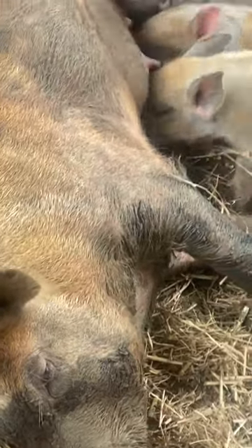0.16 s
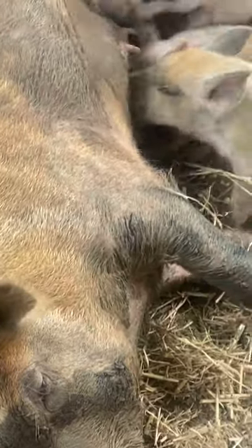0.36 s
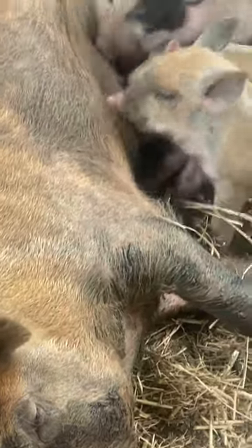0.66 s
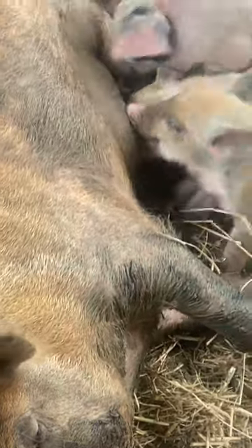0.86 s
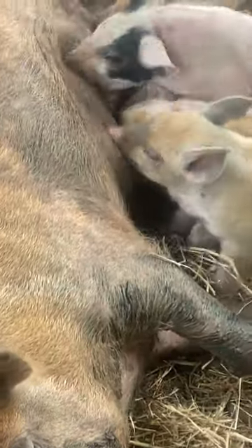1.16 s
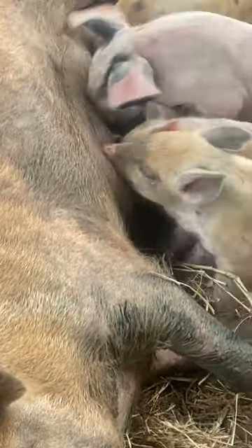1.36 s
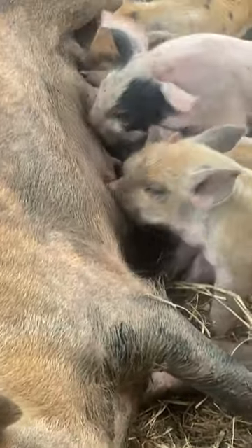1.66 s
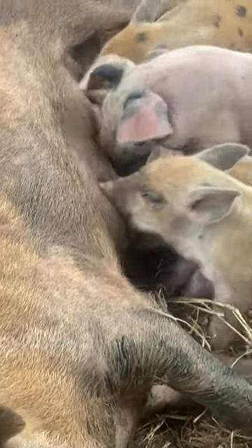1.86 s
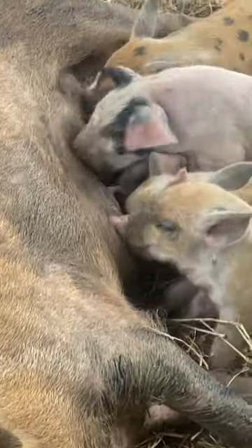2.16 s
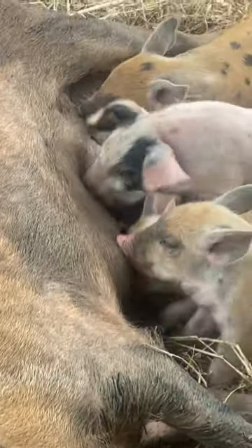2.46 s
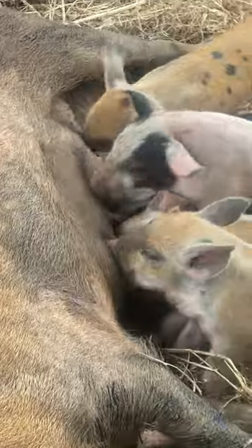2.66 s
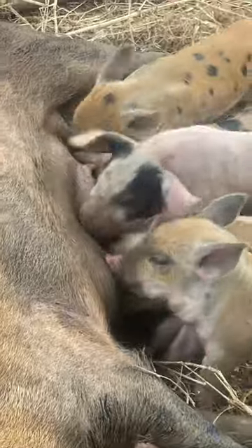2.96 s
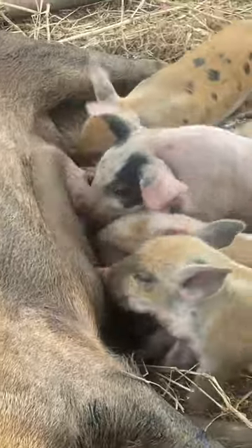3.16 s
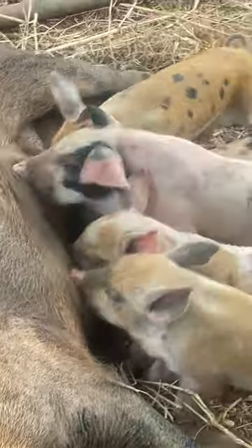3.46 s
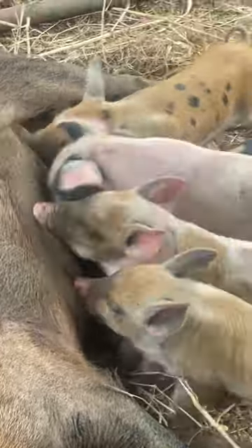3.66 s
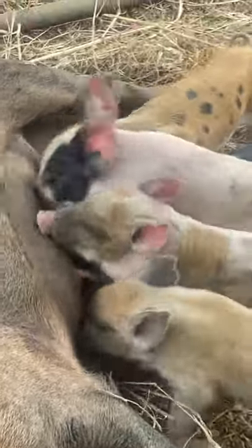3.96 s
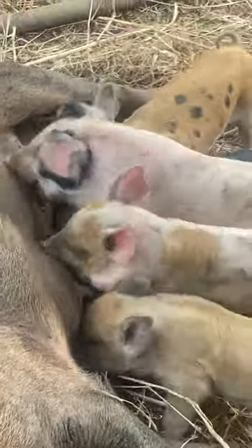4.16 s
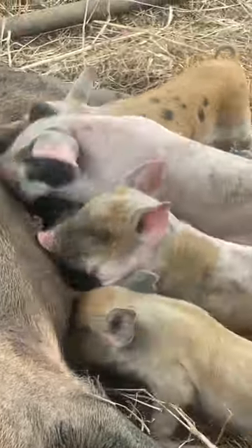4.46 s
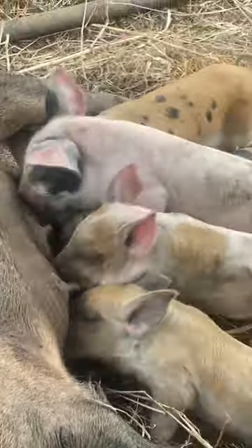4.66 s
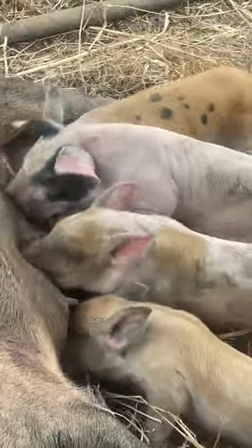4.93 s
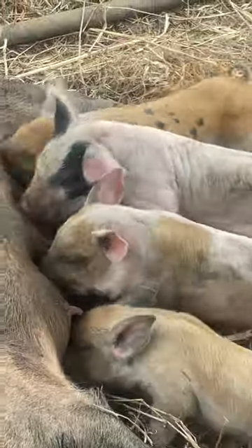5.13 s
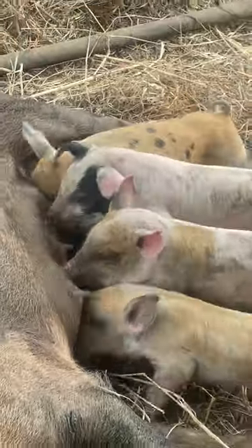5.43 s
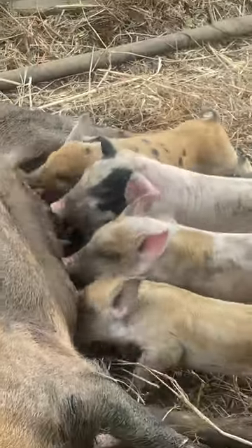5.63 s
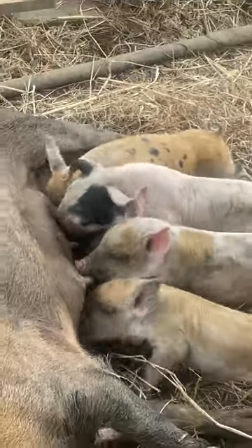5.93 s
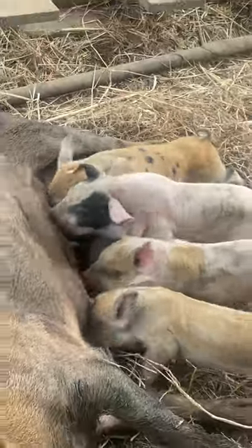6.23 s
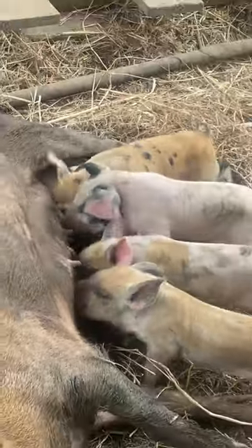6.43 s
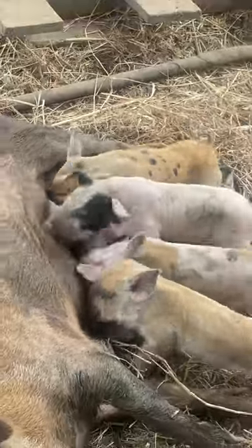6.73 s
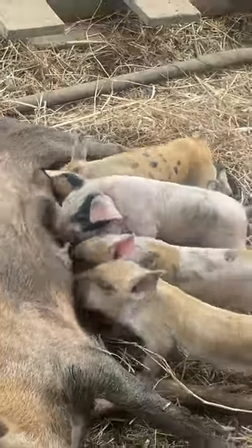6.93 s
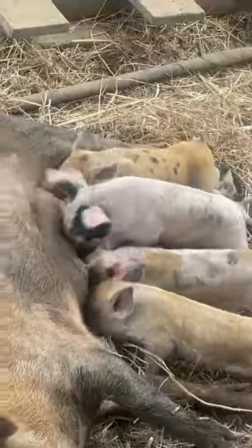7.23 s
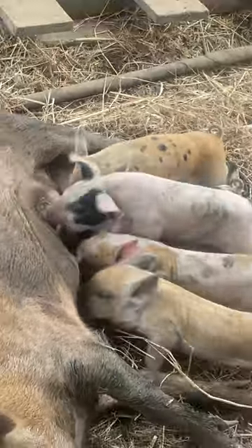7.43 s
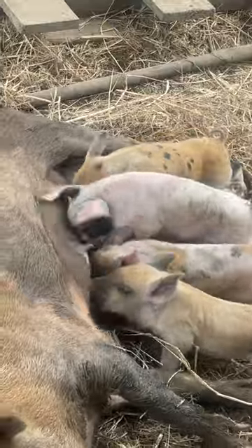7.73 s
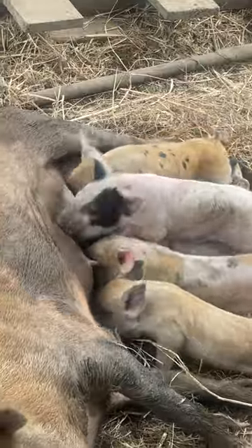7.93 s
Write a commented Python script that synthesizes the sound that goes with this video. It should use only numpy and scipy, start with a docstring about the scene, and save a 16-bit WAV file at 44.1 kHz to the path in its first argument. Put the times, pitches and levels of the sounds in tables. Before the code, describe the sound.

Short, deep, throaty grunts from a sow keep up a slow, steady pulse near the microphone. Much softer, her suckling piglets smack, snuffle and let out a few tiny grunts and faint, thin squeaks, while straw rustles lightly now and then. The pen has a slight echo, with a soft outdoor rumble and a high, insect-like hiss in the background.

```python
"""Low, rattling grunts come in a slow rhythm: a sow lies in straw, nursing her piglets.
Each grunt is a handful of slow vocal-fold beats that excite the resonances of her throat and snout,
sharp in the middle and soft at the end. The piglets grunt, smack, snuffle and squeak at the teats,
and straw ticks under their feet. The pen returns a short echo; behind it all lie low farm air
and a steady high hiss, like far insects."""
import sys
import numpy as np
from scipy import signal
from scipy.fft import rfft, irfft, next_fast_len
from scipy.io import wavfile
from scipy.ndimage import uniform_filter1d

SR = 44100
rng = np.random.default_rng(int(sys.argv[2]) if len(sys.argv) > 2 else 0)


def master(y):
    """Save y as 16-bit WAV."""
    cut = np.clip(np.atleast_2d(y).T, -1, 1)
    pcm = np.round(cut * 32767)  # scale
    wavfile.write(sys.argv[1], SR, pcm.astype(np.int16))


N = 356769
RING_SIZE = 8192  # samples in which a resonance dies away

# the sow's grunts: start_s, beat_count, first_rate_hz, snap_attack_s, snap_hold_s, chest_db, snap_db
SOW_GRUNTS = [(0.061, 7, 35.94, 0.036, 0.061, -25, -26.5), (0.5765, 6, 35.55, 0.033, 0.023, -26.5, -27.5),
              (0.983, 6, 35.9, 0.034, 0.021, -24, -29.5), (1.159, 6, 33, .058, .01, -28, -31),
              (1.374, 7, 33.75, 0.019, 0.095, -25.5, -25.5), (1.739, 6, 34.36, 0.059, 0.02, -26.5, -27),
              (2.217, 7, 35.73, 0.073, 0.011, -25, -27), (2.7221, 7, 36.72, .038, 0.034, -25.5, -25),
              (3.226, 6, 34.94, 0.022, 0.054, -24, -28.5), (3.631, 6, 36.45, 0.07, 0.011, -25.5, -30),
              (4.135, 5, 34.55, 0.036, 0.035, -26, -31), (4.245, 9, 32.9, .05, .1, -28.5, -58),
              (4.5223, 6, 32.55, 0.031, .012, -25.5, -32.5), (4.7426, 7, 32.55, 0.043, 0.07, -27, -27),
              (5.0931, 6, 35.98, 0.047, 0.033, -24.5, -24), (5.4521, 6, 35.43, 0.056, 0.053, -25, -25.5),
              (5.8957, 5, 36.15, 0.014, 0.048, -23, -25.5), (6.3064, 7, 35.24, .053, 0.043, -25.5, -24.5),
              (6.601, 6, 36.52, 0.05, 0.03, -24.5, -29.5), (6.9653, 7, 36.28, 0.043, 0.031, -24, -25.5),
              (7.43, 7, 38.5, 0.038, 0.045, -23.5, -23), (7.822, 7, 36.44, 0.054, 0.018, -23.5, -22)]
# resonances of her throat, snout and pen: centre_hz, width_hz, gain_db
SOW_RESONANCES = [(73.4, 34.7, -4), (130, 8, -7), (153.3, 57, -0.5), (231, 26, -12.5), (298, 48, -10.5),
                  (434, 35, -3.5), (484, 41, -8), (567, 79, -8), (640, 67, -11.5), (717, 61, -13.5),
                  (795, 63, -18), (852, 49, -8.5), (913.3, 42, -9.5), (955, 160, -20), (1098, 107, -24.5),
                  (1280, 83, -26), (1360, 150, -26), (1493, 34, -16), (1544, 206, -23), (1729, 20, -21.5),
                  (2347, 300, -25), (2833, 83, -24.5), (2974, 107, -26), (3098, 46, -22), (3715, 40, -22.5),
                  (4010, 620, -24.5), (4255, 110, -18), (5140, 180, -34), (8500, 210, -37.5),
                  (9940, 73, -32.5)]
# the piglets' grunts: middle_s, half_length_s, top_pitch_hz, level_db
PIGLET_GRUNTS = [(4.334, 0.12, 151.8, -35.5), (5.071, 0.0356, 150, -46), (6.216, 0.061, 148.4, -49)]
# resonances of a piglet's throat: centre_hz, width_hz, gain_db
PIGLET_RESONANCES = [(156, 107, 6.5), (325, 74, 1), (678, 120, -3.5), (1380, 130, -18), (1740, 640, -22),
                     (3750, 1300, -28.5)]
# wet smacks on the teats: start_s, peak_db, mouth_resonance_hz, t60_s
SMACKS = [(0.7954, -68, 4540, 0.05), (1.14, -42, 4170, 0.043), (2.1356, -49.5, 3220, 0.044),
          (2.148, -47, 2850, 0.035), (2.9057, -33, 3100, 0.023), (5.848, -44.5, 2180, 0.053),
          (6.041, -34, 3520, 0.076), (6.581, -45.5, 2690, 0.05), (6.835, -38.5, 2320, 0.081),
          (7.639, -42, 3950, 0.055)]
# the pigs' snuffles: middle_s, half_length_s, snout_hum_db, nostril_hiss_db
SNUFFLES = [(0.297, 0.31, -87, -63), (0.895, 0.062, -58, -68.5), (3.09, 0.096, -56, -63.5),
            (3.43, 0.081, -53, -53.5), (3.578, 0.094, -64.5, -60.5), (4.084, 0.022, -60, -58),
            (4.338, 0.055, -45.5, -56.5), (5.092, 0.014, -40.5, -52), (6.215, .07, -51, -57),
            (6.907, 0.047, -62, -61.5), (7.312, 0.11, -56.5, -60.5), (7.435, 0.023, -35, -70)]
# thin squeaks: middle_s, half_length_s, pitch_hz, glide_hz_per_s, level_db
SQUEAKS = [(1.625, 0.025, 3300, 4000, -62), (1.905, 0.017, 3580, -15000, -53),
           (5.563, .3, 2250, -250, -67.5)]
# rustles of straw: middle_s, half_length_s, level_db
RUSTLES = [(1.146, .12, -54), (1.344, .025, -53), (3.648, .25, -60), (5.081, 0.025, -49.5),
           (5.856, .011, -51.5), (6.583, 0.0062, -48)]
# swells of the insects' shrill band: middle_s, half_length_s, level_db
INSECT_SWELLS = [(2.05, 1, -60.5), (5.115, 0.74, -65)]
# spectrum of the farm air: frequency_hz, relative_db
AIR_SPECTRUM = [(18, -40), (30, 7.5), (155, 17), (767, -0.5), (909, 0), (1170, -0.5), (1690, -5),
                (2180, 0.5), (2420, -2.5), (2940, 0), (3790, -3.5), (4900, 3.5), (6370, -39), (10800, -120)]
# spectrum of the high hiss: frequency_hz, relative_db
HISS_SPECTRUM = [(4000, -27.5), (4600, 2.5), (4890, -43), (5100, 0), (5900, -1), (6700, 2.5), (7300, -6),
                 (8500, -7), (10300, -7), (11500, -17.5), (13000, -105)]
# slow drift of the hiss: time_s, level_db
HISS_LEVEL = [(0.0, -54.5), (0.99, -57), (1.28, -57), (2.72, -57.5), (4.71, -55), (7.21, -56),
              (8.09, -54.5)]
# balance of the two microphone ports: frequency_hz, left_minus_right_db
PORT_BALANCE = [(250, 0), (420, 1), (700, 3), (1120, 2), (1800, 0), (11000, 0)]
# phase between the ports: frequency_hz, left_lead_rad
PORT_PHASE = [(200, 0), (430, -.45), (700, -.3), (950, .3), (1800, .1), (2580, 1.1), (3400, .4), (4100, .5),
              (4650, 1.4), (5250, 0), (6500, .9), (7500, 1.4), (11000, 2.3)]


def sow_grunts(quicken_per_beat=.025, jitter=.005, first_beat_s=.00205, beat_s=.011, lag_cycles=1.532,
               scatter_db=1.74, snap_scatter_db=2.2, stretch=.018, sag=.052,
               rasp_db=-5, rasp_s=.027, rasp_hz=1100):
    """Source and filter: fold beats ring the throat; the harder the folds shut, the brighter the beat."""
    hz, age, out = freqs(RING_SIZE), np.arange(RING_SIZE) / SR, np.zeros(N)
    throat = resonances(hz, SOW_RESONANCES) / np.sqrt(1 + (38 / hz) ** 6)
    throat *= np.sqrt(beat_s * SR / np.sum(irfft(throat) ** 2))  # the energy of beat_s at rms 1
    snap_share = on_log(hz, [(170, 0), (600, .6), (1200, 1), (4000, 1.2)])
    # as the grunt runs out the folds slacken: more boom and hollow, less edge
    slack_db = on_log(hz, [(80, 12), (150, 0), (400, 6), (850, 6), (1500, 0), (4000, -10)])
    # the lows leave the body a little later than the snap
    bass_lag = np.exp(-2j * np.pi * lag_cycles * np.log(1 + hz / 120))
    rasp_gain = undb(rasp_db) / np.sqrt((1 + (hz / rasp_hz) ** 2) * (1 + (220 / hz) ** 4))
    for start, beats, first_hz, attack, hold, chest_db, snap_db in SOW_GRUNTS:
        rates = first_hz * (1 + quicken_per_beat * np.arange(beats - 1))
        periods = (1 + jitter * rng.standard_normal(len(rates))) / rates
        times = np.r_[first_beat_s, np.cumsum(periods)]
        for t in times:
            progress = t / times[-1]
            size, edge, shape = rng.standard_normal(3)
            chest = chest_db + arch(progress, peak=.46, half=.51)
            snap = snap_db + snap_envelope(t, attack, hold) + snap_scatter_db * edge
            brightness_db = max(snap - chest, -22) * snap_share
            beat_db = chest + brightness_db + slack_db * (progress - .5) + scatter_db * size
            # the soft throat changes shape from beat to beat; its low resonances sink at the very end
            sink = sag * progress ** 4 / (1 + (hz / 500) ** 2)
            ring = np.interp(hz * (1 + stretch * shape + sink), hz, throat)
            # loose tissue keeps fluttering in the air stream after each closure
            flutter = rng.standard_normal(RING_SIZE) * np.exp(-(age / rasp_s) ** 2)
            push = 1 + rasp_gain * rfft(flutter / np.linalg.norm(flutter))
            add(out, start + t, irfft(push * causal(ring * undb(beat_db)) * bass_lag))
    return out


def snap_envelope(t, attack, hold, onset_db=-23, release_db_per_s=358):
    """Attack, hold and release: how hard the folds shut, in dB."""
    return onset_db * max(1 - t / attack, 0) ** 1.58 - release_db_per_s * max(t - attack - hold, 0)


def piglet_grunts(droop=.12, roughness=.07, breath_db=-5):
    """Source and filter: uneven fold beats and breath drive a small throat; pitch arches with effort."""
    t, out = np.arange(N) / SR, np.zeros(N)
    waver = 1 + roughness * walk(200)
    breath = undb(breath_db) * rng.standard_normal(N)
    throat = resonances(freqs(N), PIGLET_RESONANCES)
    for middle, half, top_hz, db in PIGLET_GRUNTS:
        pitch = top_hz * (1 - droop * np.minimum(((t - middle) / half) ** 2, 1))
        cycles = np.cumsum(pitch * waver) / SR
        pulses = unit(np.diff(np.floor(cycles), prepend=0))
        out += unit(shaped(pulses + breath, throat)) * undb(db + arch(t, middle, half))
    return out


def smacks(width_hz=1500, grain=.14, attack_s=.0025):
    """Cavity resonance: a lip lets go of a teat, and a burst of tiny wet clicks rings the mouth."""
    t, out = np.arange(RING_SIZE) / SR, np.zeros(N)
    for start, db, hz, t60 in SMACKS:
        clicks = rng.standard_normal(RING_SIZE) * np.exp(grain * held_noise(RING_SIZE, 64))
        envelope = undb(-60 * t / t60) * (1 - np.exp(-t / attack_s))
        mouth = causal(resonances(freqs(RING_SIZE), [(hz, width_hz, 0)]))
        burst = shaped(clicks * envelope, mouth)
        add(out, start, burst / np.abs(burst).max() * undb(db))
    return out


def snuffles(puff_delay_s=.006, puff_half_s=.013, puff_re_chest_db=-24.5):
    """Turbulence: air hums in a snout and hisses at the nostrils; a puff opens each of the sow's grunts."""
    puffs = [(start + puff_delay_s, puff_half_s, chest_db + puff_re_chest_db)
             for start, *_, chest_db, _ in SOW_GRUNTS]
    hums = [(middle, half, db) for middle, half, db, _ in SNUFFLES]
    hisses = [(middle, half, db) for middle, half, _, db in SNUFFLES]
    snout = noise_swells(puffs + hums, centre_hz=500, spread=1, grain_db=4)
    nostrils = noise_swells(hisses, centre_hz=2450, spread=.78, grain_db=3)
    return snout + nostrils


def squeaks(waver=.016):
    """Frequency modulation: thin whistles glide and waver in pitch as they swell and fade."""
    t, out = np.arange(N) / SR, np.zeros(N)
    for middle, half, hz, glide, db in SQUEAKS:
        pitch = (hz + glide * np.clip(t - middle, -2 * half, 2 * half)) * (1 + waver * walk(200))
        whistle = unit(np.sin(2 * np.pi * np.cumsum(pitch) / SR))
        out += whistle * undb(db + arch(t, middle, half))
    return out


def straw_rustles():
    """Friction noise: a piglet shifts its feet in the straw."""
    return noise_swells(RUSTLES, centre_hz=7900, spread=1, grain_db=3)


def straw_ticks(ticks_per_s=45, level_db=-69, centre_hz=6000, width_hz=9000, stir_db=4):
    """Shot noise: stalks tick at random under the piglets' feet, in fits and starts."""
    onsets = rng.random(N) < ticks_per_s / SR
    strength_db = 3.5 * np.minimum(rng.exponential(size=N), 3) + stir_db * walk(3.96)
    crack = rng.standard_normal(600) * np.exp(-np.arange(600) / 130)
    ticks = signal.fftconvolve(onsets * undb(strength_db), crack)[:N]
    return band(ticks, centre_hz, width_hz) * undb(level_db)


def pen_echo(x, delay_s=.01):
    """Reverberation: boards and roof scatter sound briefly, a faint tail follows, and the bass escapes."""
    t, echo = np.arange(2 * RING_SIZE) / SR, 0
    for db, t60_s, low_cut_hz in (-11, .094, 600), (-27, .88, 200):
        tail = rng.standard_normal(len(t)) * undb(-60 * t / t60_s) * (t > delay_s)
        low_cut = causal(1 / np.sqrt(1 + (low_cut_hz / freqs(len(t))) ** 4))
        echo = echo + undb(db) * shaped(tail / np.linalg.norm(tail), low_cut)
    return signal.fftconvolve(x, echo)[:N]


def insects(centre_hz=6580, width_hz=380, floor_db=-70, throb_db=2):
    """Amplitude modulation: a distant, shrill band of noise throbs, swells and sinks."""
    t = np.arange(N) / SR
    shrill = band(rng.standard_normal(N), centre_hz, width_hz)
    swell_power = sum(undb(db + arch(t, middle, half)) ** 2 for middle, half, db in INSECT_SWELLS)
    return shrill * np.sqrt(undb(floor_db) ** 2 + swell_power) * undb(-throb_db * walk(25))


def air_and_hiss(air_db=-58.5, wander_db=5.5, flicker_db=.64):
    """Coloured noise: low farm air wanders in level beneath a steady high hiss."""
    air, hiss = (unit(shaped(rng.standard_normal(N), undb(on_log(freqs(N), spectrum))))
                 for spectrum in (AIR_SPECTRUM, HISS_SPECTRUM))
    hiss_db = np.interp(np.arange(N) / SR, *np.transpose(HISS_LEVEL))
    return air * undb(air_db + wander_db * walk(8.7)) + hiss * undb(hiss_db + flicker_db * walk(30))


def noise_swells(rows, centre_hz, spread, grain_db):
    """Grainy noise in one resonance, swelling once for each row of middle_s, half_length_s, level_db."""
    out, size = np.zeros(N), 4 * RING_SIZE
    t = (np.arange(size) - size / 2) / SR
    for middle, half, db in rows:
        grains = rng.standard_normal(size) * undb(grain_db * held_noise(size, 128))
        swell = band(grains, centre_hz, spread * centre_hz) * undb(db + arch(t, 0, half))
        add(out, max(middle + t[0], 0), swell[middle + t >= 0])
    return out


def resonances(hz, modes):
    """Gain of steep-sided resonances whose powers add."""
    return np.sqrt(sum((undb(db) / (1 + ((hz ** 2 - centre ** 2) / (hz * width)) ** 2)) ** 2
                       for centre, width, db in modes))


def causal(gain):
    """Minimum phase: the spectrum of the quickest causal ring that has this gain."""
    cepstrum = irfft(np.log(gain + 1e-9))
    half = len(cepstrum) // 2
    cepstrum[1:half] *= 2
    cepstrum[half + 1:] = 0
    return np.exp(rfft(cepstrum))


def shaped(x, gain):
    """Linear filtering: one gain for each frequency bin."""
    size = next_fast_len(len(x), real=True)
    return irfft(rfft(x, size) * np.interp(freqs(size), freqs(len(x)), gain), size)[:len(x)]


def band(x, centre_hz, width_hz):
    """Band-pass filtering by one resonance, scaled to rms 1."""
    return unit(shaped(x, resonances(freqs(len(x)), [(centre_hz, width_hz, 0)])))


def walk(rate_hz):
    """Smoothed noise: a random wander of rms 1."""
    step = int(SR / rate_hz)
    levels = np.repeat(rng.standard_normal(N // step + 1), step)
    return unit(uniform_filter1d(levels, step)[:N])


def held_noise(size, step):
    """Sample and hold: a new random value every step samples."""
    return np.repeat(rng.standard_normal(size // step), step)


def arch(t, peak, half):
    """A Gaussian swell in dB, 10 dB down at half a length from its peak."""
    return -10 * ((t - peak) / half) ** 2


def on_log(hz, table):
    """Interpolate rows of frequency_hz, value on a log-frequency axis."""
    at, value = np.transpose(table)
    return np.interp(np.log(hz), np.log(at), value)


def freqs(size):
    """Bin frequencies of a spectrum, at least 1 Hz."""
    return np.maximum(np.arange(size // 2 + 1) * SR / size, 1)


def undb(db):
    """Decibels to gain."""
    return 10 ** (np.asarray(db) / 20)


def unit(x):
    """Scale to rms 1."""
    return x / np.sqrt(np.mean(x ** 2))


def add(out, start_s, x):
    """Superposition: mix x into out from start_s."""
    i = int(np.clip(start_s * SR, 0, N - 1))
    out[i:i + len(x)] += x[:N - i]


def scene(diffuse_db=-1):
    """Two-point pickup: the litter reaches two closely spaced ports with unequal level and phase."""
    litter = (sow_grunts() + piglet_grunts() + smacks() + snuffles()
              + straw_rustles() + squeaks() + straw_ticks())
    sound = litter + pen_echo(litter) + air_and_hiss() + insects()
    hz = freqs(N)
    left_gain = undb(on_log(hz, PORT_BALANCE) / 2) * np.exp(.5j * on_log(hz, PORT_PHASE))
    # the echo arrives from all sides, so it differs between the ports
    diffuse = undb(diffuse_db) * pen_echo(litter)
    return np.array([shaped(sound, left_gain) + diffuse, shaped(sound, 1 / left_gain) - diffuse])


def record(dry, cutoff_hz=11700):
    """Band limiting: the phone's steep low-pass filter cuts the top."""
    return signal.sosfilt(signal.ellip(8, .2, 70, cutoff_hz, fs=SR, output="sos"), dry)


dry = scene()
out = record(dry)
master(out)
```